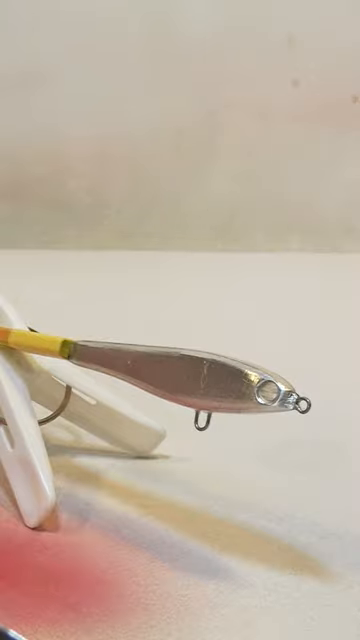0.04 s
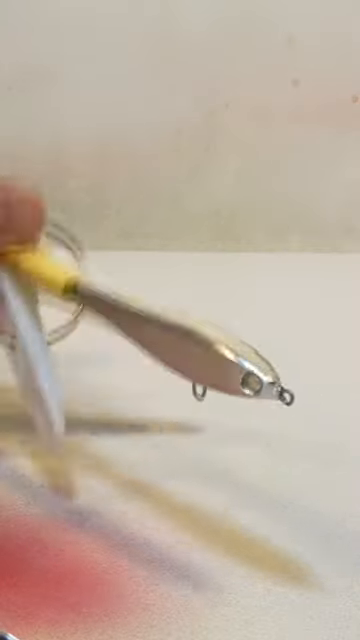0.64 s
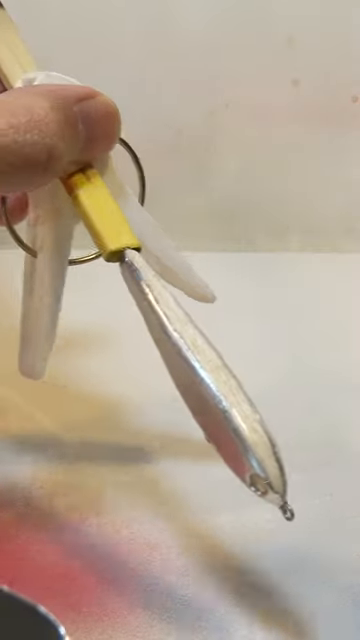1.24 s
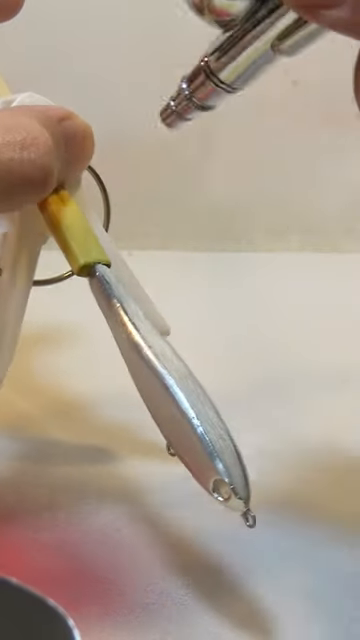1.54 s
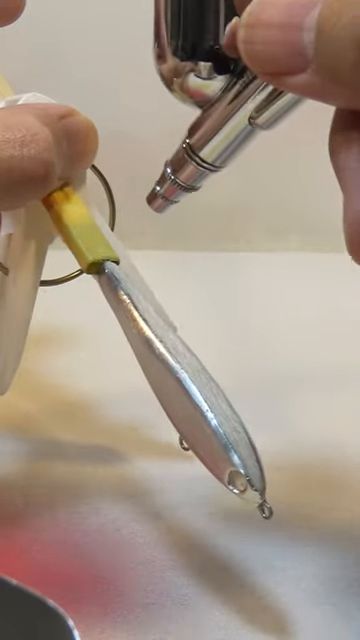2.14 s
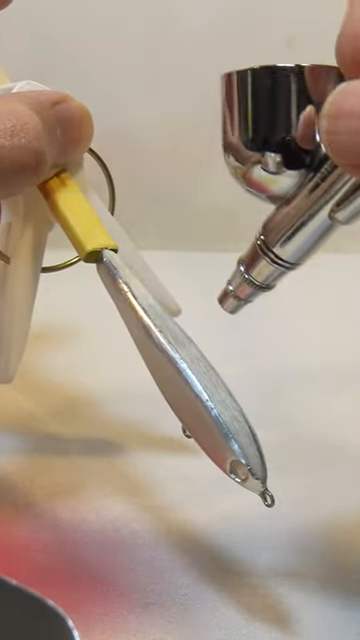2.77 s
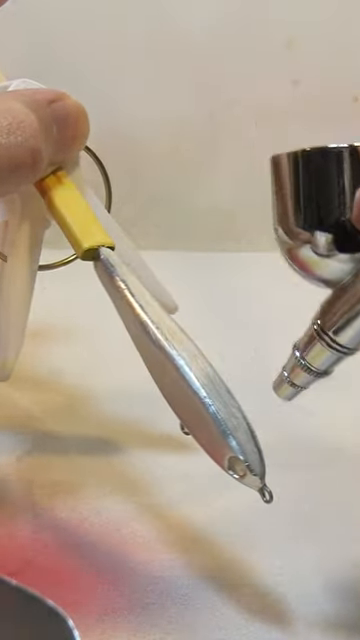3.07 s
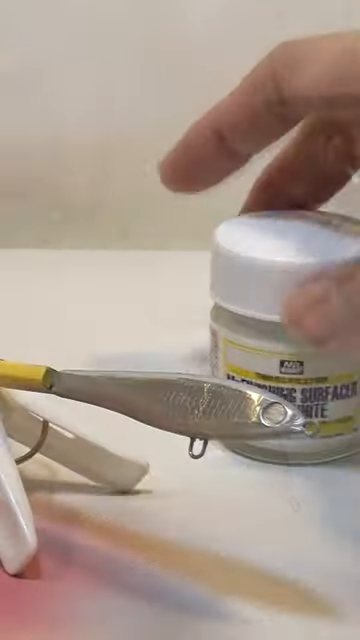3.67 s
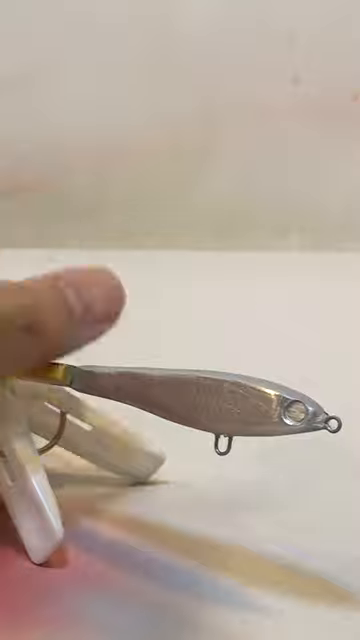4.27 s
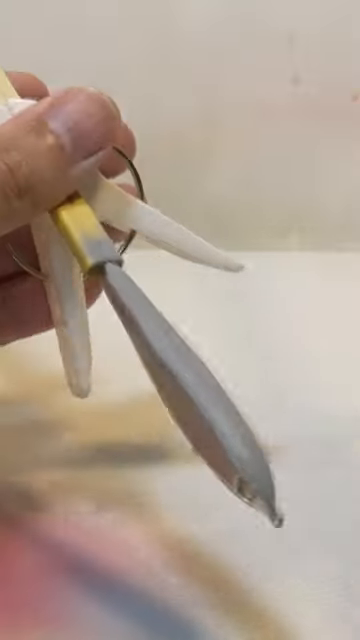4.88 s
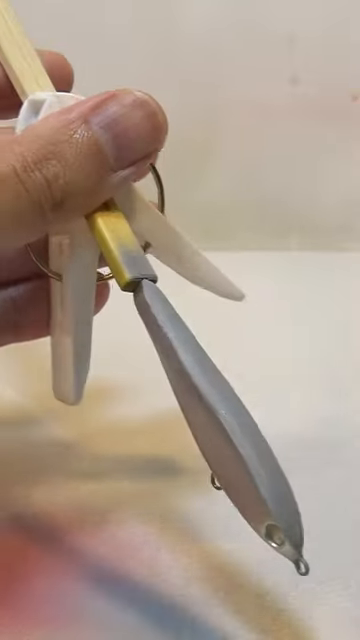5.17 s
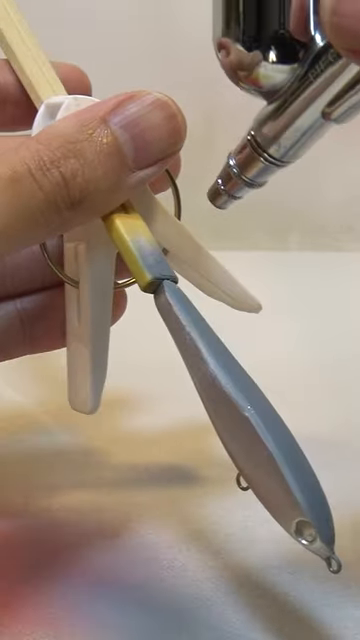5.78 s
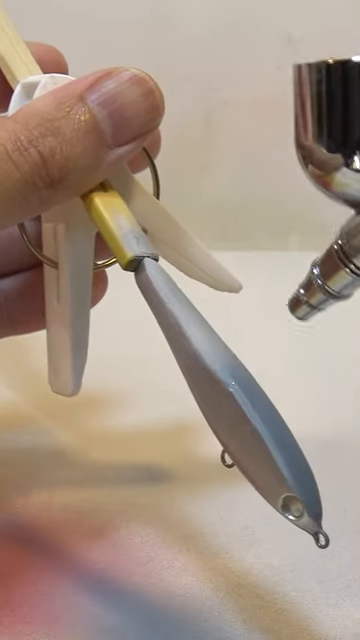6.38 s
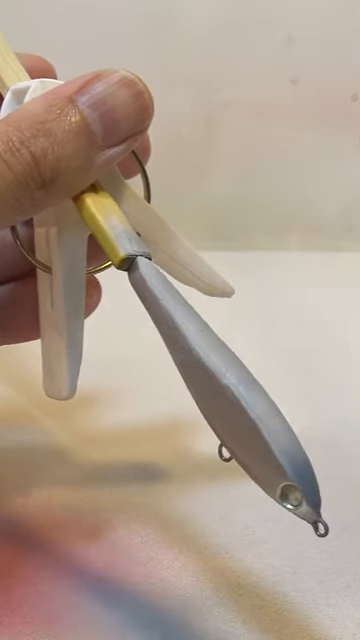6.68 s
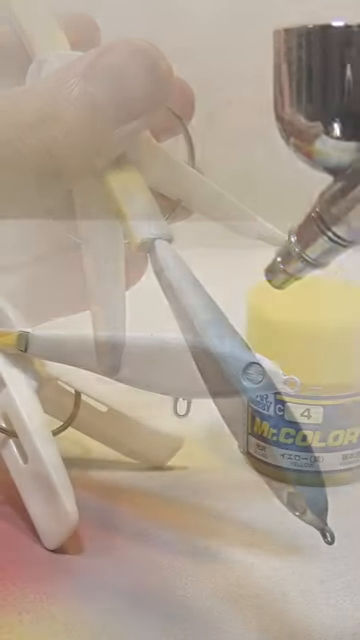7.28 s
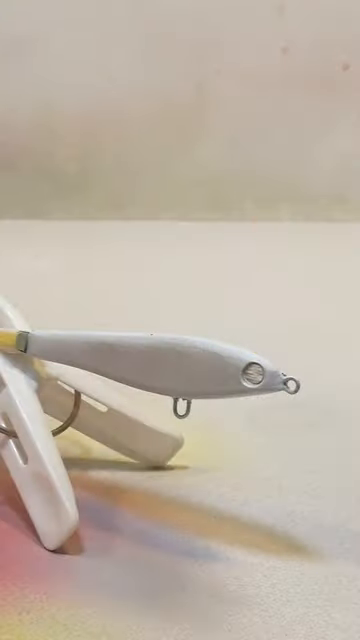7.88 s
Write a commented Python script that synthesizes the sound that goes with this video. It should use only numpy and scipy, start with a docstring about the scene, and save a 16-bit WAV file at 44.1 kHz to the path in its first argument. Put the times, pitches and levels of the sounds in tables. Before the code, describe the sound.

A bright, close airbrush hiss runs from start to finish, swishing and shifting in tone as the nozzle moves. Under it a small compressor hums steadily, slightly to the right, over faint workshop noise. There is a tiny tick at the very start, and at about 0.5 seconds a plastic clamp knocks sharply on the bench, the loudest click, followed by a faint tick at 1 second. From about 1.4 to 3.3 seconds the jet strikes a small lure, adding a soft lower rush beneath the hiss. The hiss eases and wavers around 3.5 to 4 seconds. At about 4.8 seconds the clamp gives a quick, lighter rattle of several knocks. From about 5.3 seconds the hiss grows stronger and the lower rush returns for a second coat, breaking briefly near 6.9 and swelling until 7.6. Hiss and hum continue to about 8 seconds.

```python
"""A bright airbrush hiss runs without pause, swishing as the hand moves the nozzle's turbulent jet.
A small compressor hums nearby at the harmonics of its pump stroke, over faint workshop noise.
The plastic clamp holding a small lure knocks and rattles on the bench as it is picked up.
Twice a coat of paint goes on: the jet breaks up on the lure and adds a lower rush."""
import sys
import numpy as np
from scipy import signal
from scipy.io import wavfile
from scipy.ndimage import map_coordinates

SR = 44100
rng = np.random.default_rng(int(sys.argv[2]) if len(sys.argv) > 2 else 0)


def pcm_store(signal):
    """Save signal as 16-bit PCM."""
    levels = np.round(np.clip(np.atleast_2d(signal), -1, 1) * 32767)
    wavfile.write(sys.argv[1], SR, levels.astype(np.int16).T)


N = 349272
TIME = np.arange(N) / SR
STEADY_UNREST = 0.47  # jet under a steady hand, 0-1

# passes of the jet over the lure, one list a coat: (start [s], end [s], start level [dB], fade [dB/s])
COATS = [
    [(1.393, 3.293, -42.5, 3)],
    [(5.28, 6.87, -42, -1.8), (6.93, 7.62, -41.5, 20.5)],
]


def from_db(db):
    """Decibels to gain."""
    return 10 ** (np.asarray(db) / 20)


def rms_one(x):
    """Scale to unit rms."""
    return x / np.sqrt(np.mean(x ** 2) + 1e-20)


def butter(x, order, hz, kind="low"):
    """Butterworth filter."""
    return signal.sosfilt(signal.butter(order, hz, kind, fs=SR, output="sos"), x)


def in_time(rows):
    """Each column of a curve at every sample."""
    times_s, *columns = np.transpose(rows)
    return [np.interp(TIME, times_s, column) for column in columns]


def at_hz(spectrum, hz):
    """Read a spectrum on a log-frequency axis."""
    points_hz, points_db = np.transpose(spectrum)
    return np.interp(np.log(hz), np.log(points_hz), points_db)


def bell(hz, centre_hz, octaves):
    """Peak of height 1 on a log-frequency axis."""
    return np.exp(-.5 * (np.log2(hz / centre_hz) / octaves) ** 2)


def gate(start_s, end_s, attack_s, release_s):
    """Trapezoid of height 1."""
    return np.clip(np.minimum((TIME - start_s) / attack_s, (end_s - TIME) / release_s), 0, 1)


def swell(middle_s, length_s):
    """Rounded rise and fall of height 1."""
    return np.cos(np.pi * np.clip((TIME - middle_s) / length_s, -.5, .5)) ** 2


def drift(rate_hz, hop=40):
    """Smooth random wander of spread 1."""
    pole = np.exp(-2 * np.pi * hop * rate_hz / SR)
    white = rng.standard_normal(N // hop + 2002)
    slow = signal.lfilter([1], [1, -2 * pole, pole * pole], white)[2000:]
    return np.interp(np.arange(N) / hop, np.arange(len(slow)), rms_one(slow))


def noise_bands(edges_hz, order=3):
    """Adjoining noise bands, neighbours unrelated: (centre [Hz], band)."""
    white = rng.standard_normal((2, N))
    for k, (low, high) in enumerate(zip(edges_hz, edges_hz[1:])):
        yield np.sqrt(low * high), butter(white[k % 2], order, [low, high], "band")


def coloured_noise(spectrum):
    """Steady low and middle noise of a given spectrum, rms 1."""
    bands = noise_bands(np.r_[20, 45, 90, np.geomspace(160, 4500, 25)], order=2)
    return rms_one(sum(from_db(at_hz(spectrum, hz)) * band for hz, band in bands))


def panned(x, left_db):
    """Place a sound by its left-right level difference."""
    return x * from_db(np.array([[left_db], [-left_db]]) / 2)


def early_to_late(first, second, middle_s=3.45, slide_s=0.72):
    """Slide a setting from its earlier value to its later value around 3.45 s."""
    return first + (second - first) * np.clip((TIME - middle_s) / slide_s + .5, 0, 1)


def on_lure(start_s, end_s):
    """Share of the jet striking the lure during one pass."""
    return gate(start_s, end_s, attack_s=0.086, release_s=0.071)


def hand_unrest(ease_s=0.26):
    """Unrest of the jet, 0-1: rises as the hands move things through it."""
    # hand moves: (start [s], end [s], unrest [0-1])
    moves = [(.55, 1.603, 0.87), (4.06, 4.296, .8), (4.695, 5.486, 0.99), (6.82, 7.1, 0.8)]
    return STEADY_UNREST + sum(
        (unrest - STEADY_UNREST) * gate(start_s - ease_s / 2, end_s + ease_s / 2, ease_s, ease_s)
        for start_s, end_s, unrest in moves)


def swish_db(hz, octaves=0.43):
    """Brief boosts at one frequency as the jet catches an edge."""
    # swishes: (middle [s], length [s], pitch [Hz], boost [dB])
    swishes = [(0.108, 0.055, 7000, 2), (.38, 0.36, 4220, 6), (0.522, .05, 9100, 3.5),
               (0.806, .05, 4830, 4), (0.937, 0.11, 6000, 3.5), (.935, 0.089, 14500, 6),
               (1.11, .06, 3900, 5.5), (1.188, 0.055, 4000, 7), (1.237, 0.12, 6300, 6.5),
               (1.32, 0.076, 3900, 3.5), (1.487, 0.087, 4460, 2.5), (1.576, 0.08, 3600, 5.5),
               (2.695, .25, 4700, 2.5), (2.908, 0.14, 4300, 6), (3.094, 0.14, 3780, 3),
               (3.527, 0.51, 9000, 3), (4.027, 0.23, 8000, 4), (4.397, 0.41, 3600, 2),
               (4.42, 0.39, 8000, 2.5), (5.233, .06, 4530, 4.5), (5.327, 0.038, 6500, 3.5),
               (5.526, 0.089, 5260, 6.5), (5.927, 0.13, 4800, 3.5), (6.243, 0.27, 3870, 3),
               (6.68, 0.3, 4500, 2), (6.812, 0.12, 8100, 4.5), (6.96, 0.078, 14000, 5.5),
               (7.866, .08, 6400, 9.5)]
    boost_db = np.zeros(N)
    for middle_s, length_s, pitch_hz, db in swishes:
        during = slice(*np.searchsorted(TIME, [middle_s - length_s / 2, middle_s + length_s / 2]))
        arch = np.cos(np.pi * (TIME[during] - middle_s) / length_s)
        boost_db[during] += db * arch * bell(hz, pitch_hz, octaves)
    return boost_db


def hollow_db(hz, octaves=0.15):
    """Loss at one frequency where the hiss and its bounce off a close surface cancel."""
    # gliding notches: (start [s], end [s], from [Hz], to [Hz], depth [dB])
    hollows = [(0, .5, 12000, 12700, 3.5), (1.55, 1.997, 8100, 7560, 2.5), (3.55, 4.0, 6000, 5560, 7),
               (4.03, 4.77, 6340, 6450, 6), (5.58, 5.74, 5030, 5600, 10), (5.692, 5.92, 6500, 12000, 6),
               (6.0, 6.17, 4270, 8500, 5.5), (6.1, 6.72, 8500, 10900, 7.5), (6.372, 6.57, 3970, 7440, 8.5),
               (6.683, 6.865, 7950, 5300, 6), (7.55, 7.924, 7500, 7400, 4.5)]
    loss_db = np.zeros(N)
    for start_s, end_s, from_hz, to_hz, depth_db in hollows:
        during = slice(*np.searchsorted(TIME, [start_s, end_s]))
        progress = (TIME[during] - start_s) / (end_s - start_s)
        arch = np.sqrt(np.abs(np.sin(np.pi * progress)))
        loss_db[during] += depth_db * arch * bell(hz, from_hz + progress * (to_hz - from_hz), octaves)
    return loss_db


def nozzle(gain_db=4.5, body_trim_db=2.0, sheen_trim_db=-1.0, eddy_db=4.5, eddy_hz=36,
           sway_db=0.93, flutter_db=0.8, edge_db_per_octave=65):
    """Jet turbulence: colour follows the aim; a steady jet that meets nothing half whistles."""
    # jet as the nozzle nears and turns: (time [s], hiss [dB], relative body [dB], relative sheen [dB])
    jet = [(0.0, -33, -6.5, -4.5), (1.04, -39.5, -6.5, 1.6), (1.12, -37, -2.8, 0), (1.78, -34.5, -7.5, -2),
           (2.24, -32, -5, -1.1), (3.1, -34, -1, 2.5), (3.22, -36.5, -4, 0.5), (3.82, -43, -0.5, 1.2),
           (4.44, -36.5, -5, -2), (5.0, -38, -6.5, -0.2), (5.24, -35.5, -3, -2), (5.68, -31, -6, -0.5),
           (5.8, -34, 0.5, 2.2), (6.74, -32, -2.3, -1), (7.24, -35.5, -7, -2), (7.38, -38, 2, 1.5),
           (7.7, -38.5, -8, -5), (7.92, -41.5, -3.5, 2)]
    # nozzle hiss: (frequency [Hz], density [dB])
    spectrum = [(2100, -2.5), (3300, 2), (4200, 1.7), (5200, 1.33), (6500, 0.45), (8000, 0), (10000, 0.5),
                (12000, 1.5), (14000, 6.5), (15800, 1.5)]
    hiss_db, body_db, sheen_db = in_time(jet)
    unrest = hand_unrest()
    edge_hz = early_to_late(3026, 3270)
    free_share = 1 - sum(on_lure(start_s, end_s) for coat in COATS for start_s, end_s, _, _ in coat)
    whistle_db = 3.5 * free_share * ((1 - unrest) / (1 - STEADY_UNREST)) ** 2
    eddies = [drift(eddy_hz) for _ in range(3)]
    hiss = 0
    for hz, band in noise_bands(np.geomspace(2100, 16500, 33)):
        aim_db = np.interp(hz, [4700, 6500], [1, 0]) * (body_db + body_trim_db)
        aim_db += np.interp(hz, [10500, 13200], [0, 1]) * (sheen_db + sheen_trim_db)
        low_cut_db = edge_db_per_octave * np.maximum(np.log2(edge_hz / hz), 0)
        peaks_db = whistle_db * bell(hz, centre_hz=3670, octaves=.15) + swish_db(hz)
        eddies = eddies[1:] + [drift(eddy_hz)]  # each eddy spans three bands
        churn = unrest * np.interp(hz, [5000, 12000], [1, .3]) * sum(eddies) / np.sqrt(3)
        wander_db = eddy_db * churn + sway_db * drift(3.2)
        band_db = at_hz(spectrum, hz) + aim_db - low_cut_db + peaks_db + wander_db - hollow_db(hz)
        hiss += band * from_db(band_db)
    return hiss * from_db(gain_db + hiss_db + flutter_db * unrest * drift(20))


def bounces(hiss, tremor_ms=.06, finger_ms=.45, travel_ms=.2, finger_share=.2):
    """Lure and fingers reflect the hiss over changing paths, sweeping ripples through it."""
    # bounce off lure and clamp: (time [s], delay [ms])
    lure_path = [(0, .33), (.6, .4), (1.42, .85), (1.65, .63), (2.0, .5), (3.6, .2), (5.5, .55), (6.0, .3),
                 (6.8, .5), (7.92, .33)]
    lure_ms, = in_time(lure_path)
    unrest = hand_unrest()
    lure_share = early_to_late(.22, .13)
    paths = [(lure_ms + tremor_ms * unrest * drift(1.46), lure_share)]
    for finger in range(2):
        paths.append((np.abs(finger_ms + travel_ms * unrest * drift(2.86)), finger_share * unrest ** 2))
    echoes, power = 0, 1
    for delay_ms, share in paths:
        echoes += share * map_coordinates(hiss, [np.arange(N) - delay_ms * SR / 1000], order=3)
        power += share ** 2
    return (hiss + echoes) / np.sqrt(power)


def compressor(throb_db=1.0, overtone_trim_db=-2, overtone_waver_db=2.0, motor_waver_db=4.0,
               jitter_rad=0.55):
    """Pump-stroke harmonics, the second strongest, plus wavering motor tones."""
    # brief dips of the fundamental: (middle [s], length [s], depth [dB])
    dips = [(3.477, .45, 12.5), (7.45, 0.74, 7)]
    # second harmonic: (time [s], level [dB])
    hum_curve = [(0.0, -51), (0.06, -49), (1.08, -42.5), (1.83, -48), (2.2, -44.5), (3.29, -49),
                 (3.35, -68), (3.46, -45), (3.6, -45), (3.7, -49.5), (4.87, -41.5), (5.34, -45),
                 (6.4, -43.5), (7.17, -51.5), (7.74, -43), (7.92, -46)]
    # higher harmonics: (multiple, early [dB], later [dB])
    overtones = [(3, -86, -85), (4, -68, -63.5), (6, -74, -77), (7, -63.5, -83), (8, -56.5, -61),
                 (9, -62, -60), (10, -69, -81), (14, -66, -67.5), (15, -61, -70), (16, -94, -83),
                 (17, -73, -68)]
    # motor tones: (frequency [Hz], level [dB])
    motor_tones = [(417, -72), (627, -69), (834, -79), (1550, -89), (1933, -68.5), (2046, -80)]
    stroke_hz = early_to_late(133.3, 132.1) + 0.156 * drift(0.99)
    phase = 2 * np.pi * np.cumsum(stroke_hz) / SR
    dip_db = sum(db * swell(middle_s, length_s) for middle_s, length_s, db in dips)
    stroke_db = early_to_late(-62.5, -59) - dip_db
    hum_db, = in_time(hum_curve)
    stroke = from_db(stroke_db + throb_db * drift(9)) * np.sin(phase)
    hum = from_db(hum_db + throb_db * drift(6.7)) * np.sin(2 * phase)
    buzz = 0
    for multiple, first_db, second_db in overtones:
        db = early_to_late(first_db, second_db) + overtone_trim_db + overtone_waver_db * drift(3.4)
        buzz += from_db(db) * np.sin(multiple * phase + jitter_rad * drift(19))
    for hz, db in motor_tones:
        buzz += from_db(db + motor_waver_db * drift(2.9)) * np.sin(2 * np.pi * hz * TIME + drift(4.7))
    return np.sqrt(2) * (panned(stroke, -1.2) + panned(hum, -4.0) + panned(buzz, -0.5))


def room_noise(side_db=-11):
    """Steady workshop background, slightly different in each ear."""
    # background: (frequency [Hz], density [dB])
    spectrum = [(30, -3), (60, -3.5), (120, -2), (220, 3.5), (330, 3.5), (500, 2), (800, 4.5), (1100, 1),
                (1500, 2.5), (2000, 0.5), (2600, 0.5), (4000, -47)]
    middle, side = coloured_noise(spectrum), coloured_noise(spectrum)
    return middle + from_db(side_db) * side * np.array([[1], [-1]])


def ring(force, hz, t60_s):
    """One decaying mode; a small body radiates no bass."""
    pole = from_db(-60 / (t60_s * SR))
    step_rad = 2 * np.pi * hz / SR
    return signal.lfilter([.5, 0, -.5], [1, -2 * pole * np.cos(step_rad), pole * pole], force + 1e-18)


def clamp(scatter_db=.8, tick_t60_s=.045):
    """Each contact rings the clamp, thuds into the bench and scuffs with a dry tick."""
    # contacts: (time [s], clamp ring [dB], bench thud [dB], tick [dB])
    contacts = [(0.075, -73.5, -44, -28.5), (.496, -52, -37, -53.5), (.5419, -12.5, -24.5, -15.5),
                (.5434, -26, -52, -42), (.5635, -23, -35, -45), (.997, -46, -55, -29),
                (4.748, -32, -28.5, -25), (4.763, -46, -24.5, -46), (4.768, -33.5, -43, -41),
                (4.794, -37, -37, -20.5), (4.815, -44, -32, -21), (4.822, -45, -29.5, -26),
                (4.874, -60, -51, -42)]
    # clamp modes: (frequency [Hz], level [dB], t60 [s])
    clamp_modes = [(962, -13, .12), (1400, -6.5, .05), (1471, -4, .125), (1874, -18, .1), (2045, -14, .1),
                   (2245, -18, .1), (2392, -15, .11), (3297, -12, .09), (3412, -10, .07), (3546, -10, .1),
                   (3680, -11, .07), (4042, -8, .06), (4150, -6, .05), (4312, -8, .05), (4458, -8, .09),
                   (4856, -8, .07)]
    # bench modes: (frequency [Hz], level [dB], t60 [s])
    bench_modes = [(332, -19, 0.14), (479, 0, 0.076), (578, -3.5, 0.034), (723, -8.5, 0.033),
                   (962, -12, 0.12), (1052, -6.5, 0.053), (1770, -13, 0.32)]
    times_s, ring_db, thud_db, tick_db = np.transpose(contacts)
    onsets = np.round(times_s * SR).astype(int)
    force, knocks = np.zeros(N), 0
    for modes, blow_db, lowpass_hz in ((clamp_modes, ring_db, 5400), (bench_modes, thud_db, 2000)):
        body = 0
        for k, (hz, db, t60_s) in enumerate(modes):
            force[onsets] = from_db(blow_db + db + scatter_db * rng.standard_normal(len(onsets)))
            body += (-1) ** (k // 2) * ring(force, hz, t60_s)  # modes push the air with either sign
        knocks += butter(body, 4, lowpass_hz)
    force[onsets] = from_db(tick_db)
    tick_envelope = signal.lfilter([1], [1, -from_db(-60 / (tick_t60_s * SR))], force + 1e-18)
    ticks = butter(tick_envelope * rng.standard_normal(N), 1, hz=6000)
    return butter(knocks + ticks, 2, hz=260, kind="high")


def rush(gain_db=0.5, flutter_db=1.15):
    """The jet breaks up on the lure: a lower noise that swells or fades along each pass."""
    # rush, first coat: (frequency [Hz], density [dB])
    first_spectrum = [(180, -50), (300, -19), (408, -25), (561, -30), (616, -6), (1000, -5.5), (1030, -5),
                      (1380, -9), (1710, 2.5), (2700, -4.5), (2800, -14), (3640, -44), (6160, -120)]
    # rush, second coat: (frequency [Hz], density [dB])
    second_spectrum = [(180, -51), (300, -20), (408, -19), (444, -18.5), (605, -11), (709, -18.5),
                       (771, -7.5), (1310, -6.5), (1600, 0.5), (2140, -7), (2800, -3.5), (3640, -23),
                       (6160, -120)]
    spray = 0
    for coat, spectrum in zip(COATS, (first_spectrum, second_spectrum)):
        envelope = 0
        for start_s, end_s, start_db, fade_db_per_s in coat:
            elapsed_s = np.clip(TIME - start_s, 0, end_s - start_s)
            envelope += on_lure(start_s, end_s) * from_db(start_db - fade_db_per_s * elapsed_s)
        spray += envelope * coloured_noise(spectrum)
    return spray * from_db(gain_db + flutter_db * drift(19))


def room_tail(x, t60_s=0.2, predelay_s=.004):
    """Short diffuse reverberation, different in each ear."""
    t = TIME[:SR // 2]
    tail = rng.standard_normal((2, len(t))) * from_db(-60 * t / t60_s) * (t > predelay_s)
    tail /= np.sqrt(np.sum(tail ** 2, axis=1, keepdims=True))
    return signal.fftconvolve(x[None], tail, axes=1)[:, :N]


def two_ports(x, side_db=-18, from_hz=11000, delay_s=.003):
    """The shortest waves reach the two microphone ports a little differently."""
    treble = butter(x, 3, from_hz, "high")
    late = np.interp(TIME - delay_s, TIME, treble, left=0)
    return x + from_db(side_db) * late * np.array([[1], [-1]])


def scene(room_db=-53.5, air_wet_db=-24, knock_wet_db=-13):
    """Airbrush and clamp close in front, compressor a little to the right."""
    air = bounces(nozzle()) + rush()
    knocks = clamp()
    background = from_db(room_db) * room_noise()
    reverb = room_tail(from_db(air_wet_db) * air + from_db(knock_wet_db) * knocks)
    return two_ports(air) + knocks + reverb + compressor() + background


def record(dry, cutoff_hz=15900):
    """Soft clip, then a steep treble cut."""
    return signal.sosfilt(signal.ellip(12, .1, 90, cutoff_hz, fs=SR, output="sos"), np.tanh(dry))


dry = scene()
out = record(dry)
pcm_store(out)
```